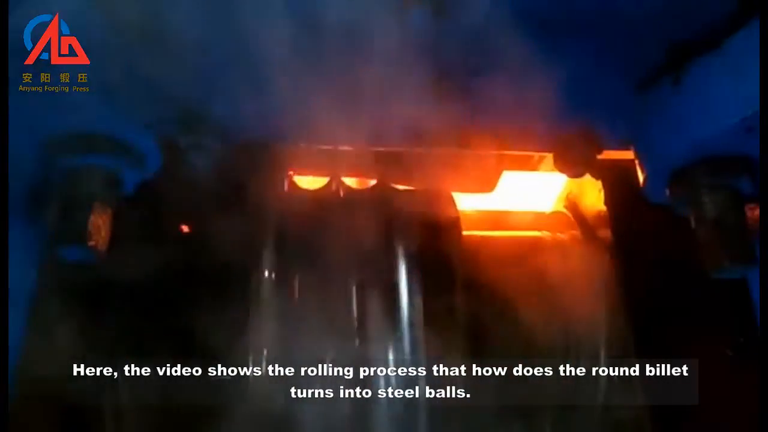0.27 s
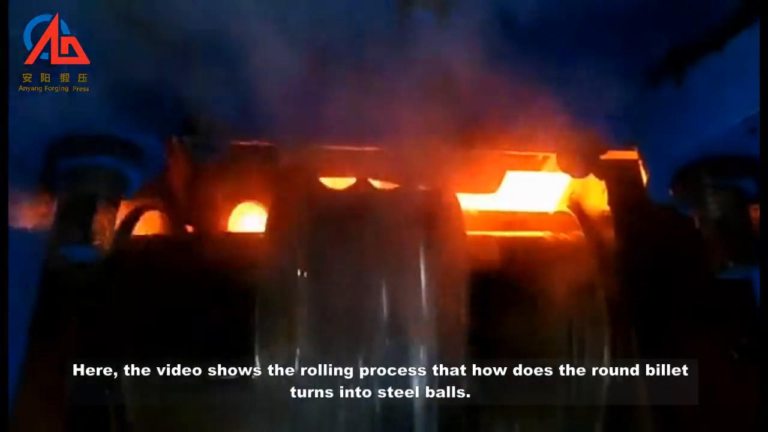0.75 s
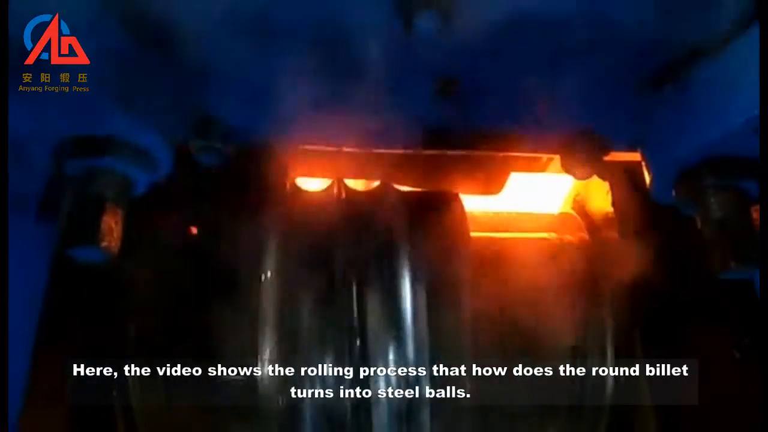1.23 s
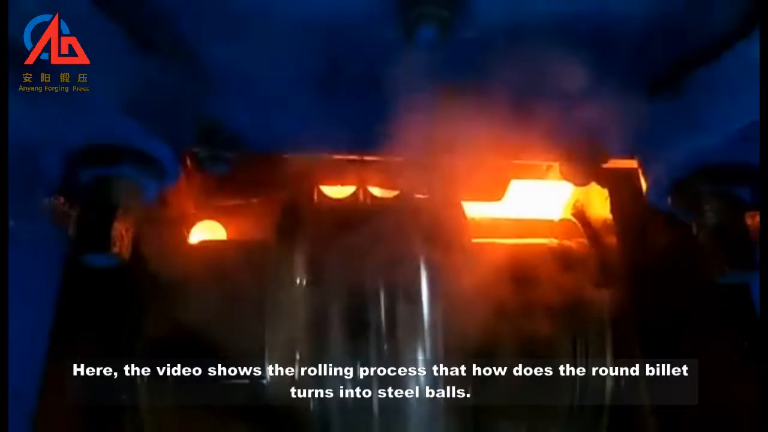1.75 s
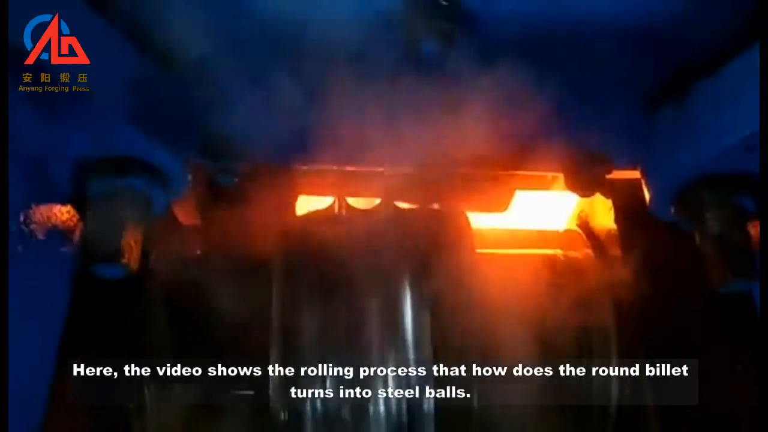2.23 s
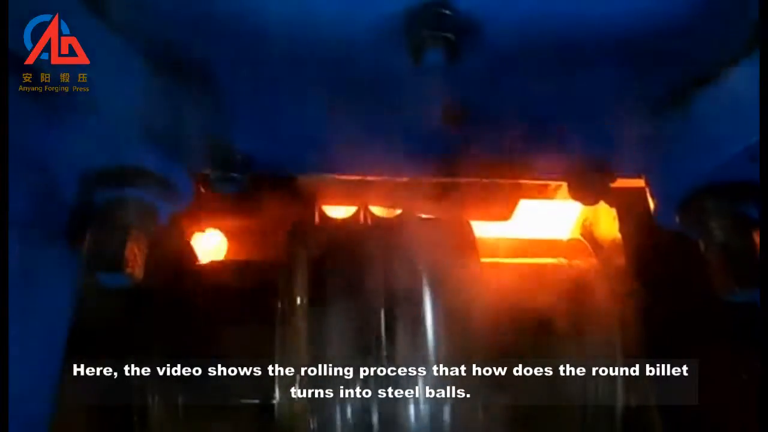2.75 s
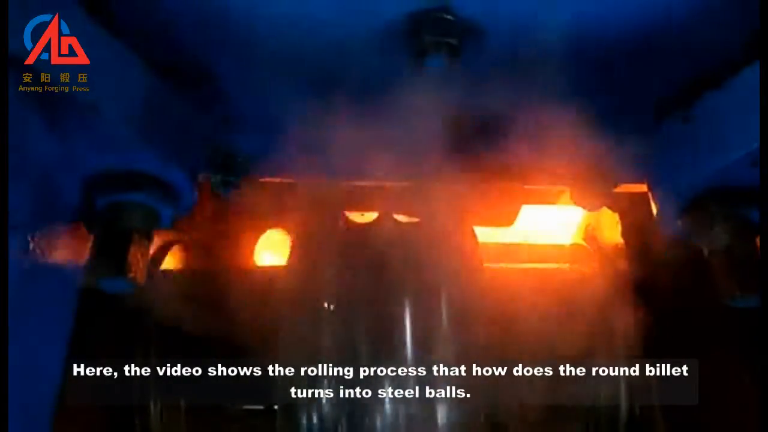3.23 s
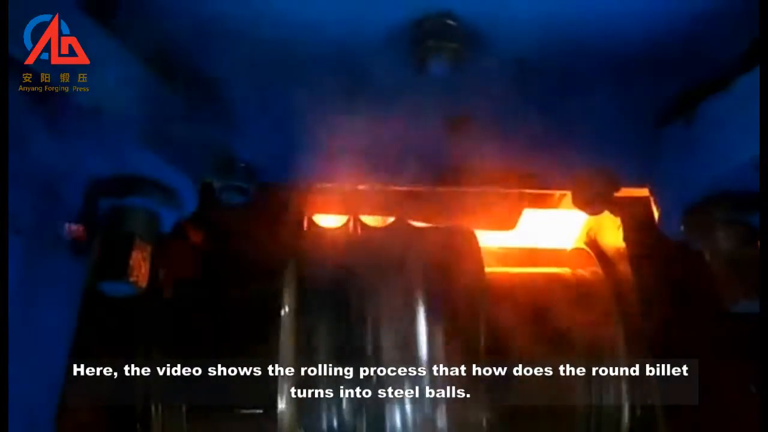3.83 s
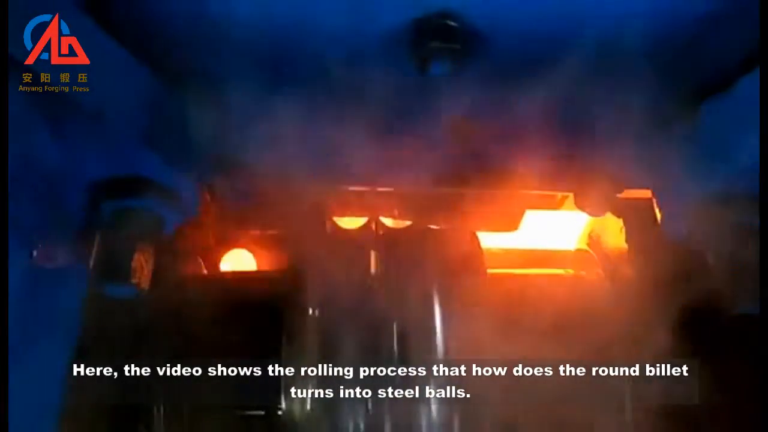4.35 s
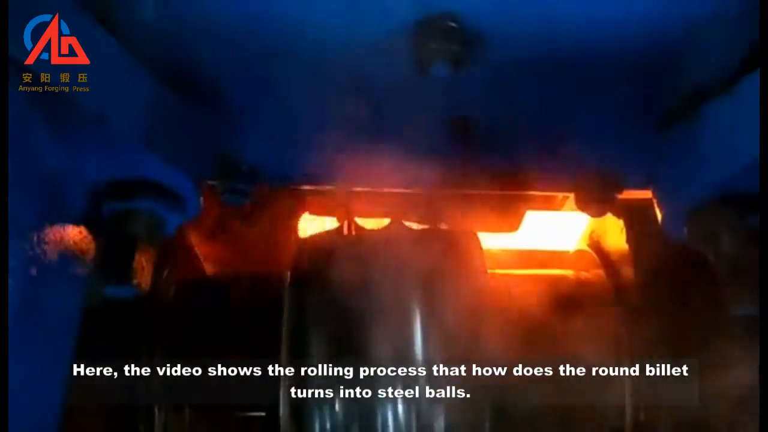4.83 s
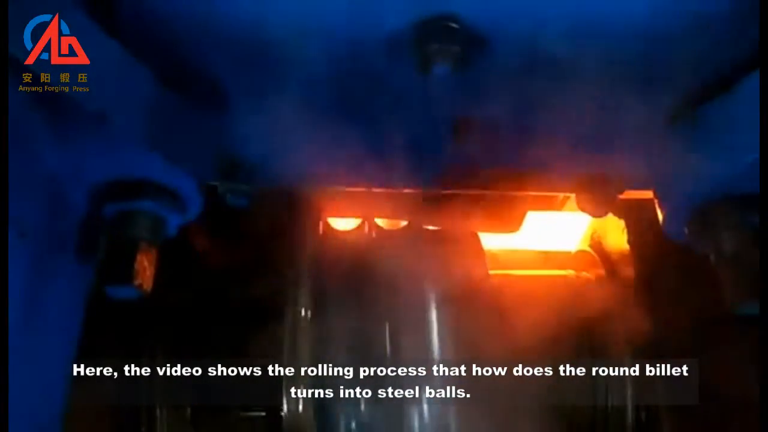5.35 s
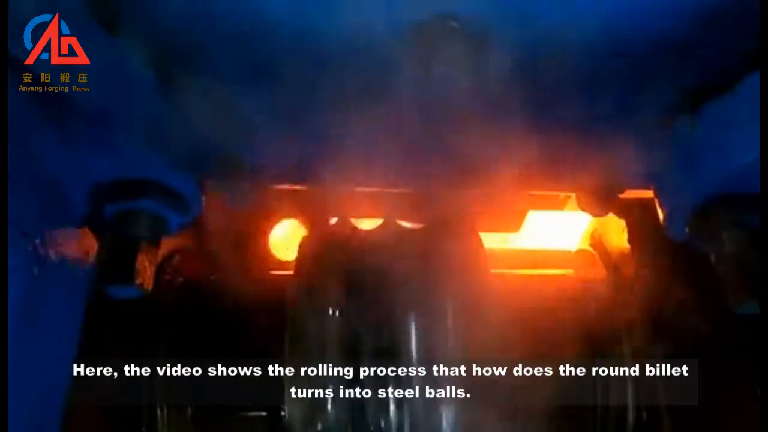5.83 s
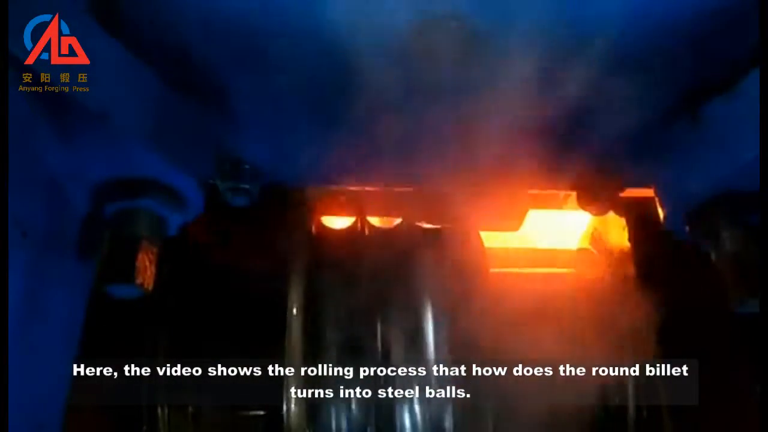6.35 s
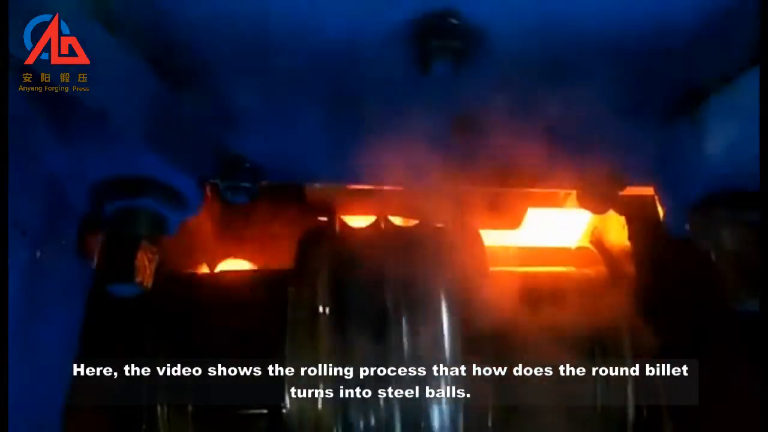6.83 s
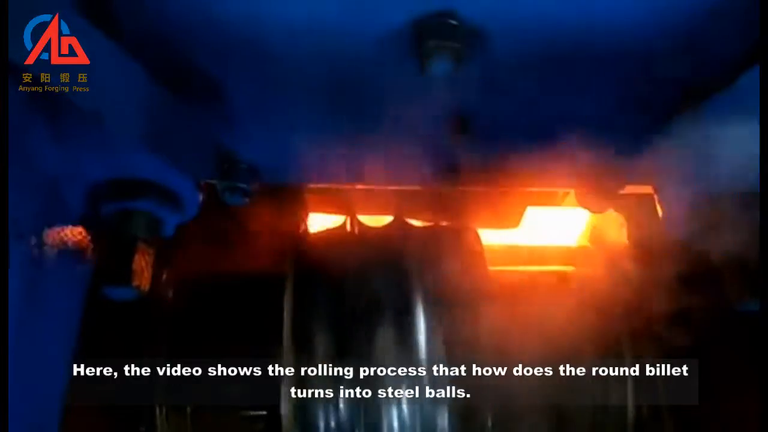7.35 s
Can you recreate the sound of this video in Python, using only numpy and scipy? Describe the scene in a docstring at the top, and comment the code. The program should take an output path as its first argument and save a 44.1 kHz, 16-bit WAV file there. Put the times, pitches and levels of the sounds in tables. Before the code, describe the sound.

Dense, uneven metallic banging and rattling of heavy balls on steel guides, with rough roller grinding, low rumble and short ringing hall echoes.

```python
"""Hot steel balls and billet knock and rattle on steel guides and chutes at a skew rolling mill, close by.
Each knock is a burst of noisy bounces and scraping, rung through the struck spot and the mill's modes.
A hall echo and chirps of small contacts trail the blows; clanks, groans, thuds and booms come and go.
Rolls grind, rumble and hum as their load changes, with a steady singing and a very faint water hiss.
The camera's gain control pushes the din down under loud knocks, and the loudest peaks clip."""
import sys
import numpy as np
from scipy import signal
from scipy.fft import rfft, irfft
from scipy.io import wavfile
from scipy.ndimage import uniform_filter1d

SR = 44100
rng = np.random.default_rng(int(sys.argv[2]) if len(sys.argv) > 2 else 0)


def store_wav(level_fs):
    """Save 16-bit WAV to argv[1]."""
    pcm = np.round(np.clip(np.atleast_2d(level_fs), -1, 1) * 32767)
    wavfile.write(sys.argv[1], SR, pcm.T.astype(np.int16))


N = 334278
TIME = np.arange(N) / SR
EDGE_HZ, SPIT_EDGE_HZ = 7560, 16000  # band limits: of the sound, and of the spit from clipped peaks

# balls and billet hitting the steel; the share not on the chute lands on the guides:
# start_s, force_db (relative), rise_s (before limits), extra_body_db, chute_share (0-1)
KNOCKS = [(0.0, 12.5, 0.0026, -5, 0.8), (.05, -1.5, 0.028, -5.5, 0.6), (0.094, 1.5, 0.02, -7, 0),
          (.165, -6, 0.011, 5.5, 0.3), (.268, -4, 0.042, 1, 0), (.34, -8, 0.038, -1, 0.5),
          (0.425, -3, 0.024, 4, 0.7), (0.499, -12, 0.013, 3, 0.6), (.588, -0.5, 0.0046, 4, 0),
          (.776, -2, 0.0052, 7, 1), (.848, 12, 0.0092, -3.5, 0.9), (0.906, 1.5, 0.028, -6, 0.4),
          (1.0, -5.5, 0.031, 3, 0.8), (1.08, -20.5, 0.065, 13.5, 0.1), (1.161, -24, 0.05, 3.5, 0.6),
          (1.254, -3.5, 0.005, 2.5, 0.2), (1.303, -7, 0.0021, 4.5, 0.15), (1.334, 3.5, 0.0056, -27, 0.4),
          (1.418, -8, 0.013, 3, .5), (1.459, 0.5, 0.041, 0.5, 0.3), (1.502, -5, 0.018, 0.5, 0),
          (1.535, -1.5, 0.009, -1, 0.04), (1.595, -4, 0.0078, 5, 0.9), (1.64, -6, 0.014, 0, 0.4),
          (1.685, -12.5, 0.017, 5, 0.4), (1.72, 4.5, 0.0089, -4.5, 0.94), (1.851, -1.5, 0.021, -1.5, 0.88),
          (1.957, -13.5, 0.0077, -2, 0), (2.149, 1, 0.019, -12.5, 0), (2.249, -7.5, 0.012, 2, 0.1),
          (2.298, -15, 0.0044, -3, 0.05), (2.565, 7, 0.0031, -5, 0.97), (2.699, 0.5, 0.0084, 0.5, 1),
          (2.755, 6.5, 0.024, 0, 0.15), (2.806, -2, 0.028, 3, 1), (2.871, -9, 0.025, 6.5, 1),
          (2.947, -10.5, 0.028, 1, 0.2), (3.003, -6, 0.008, 6.5, 0.2), (3.126, 1, 0.0097, 8.5, 0.4),
          (3.178, -31, 0.0054, 7, 0.6), (3.357, 8.5, 0.0075, -1.5, 0.8), (3.428, -1.5, 0.0019, 1.5, 0),
          (3.554, -9.5, 0.0046, 7.5, 0.5), (3.624, -8, 0.012, 4.5, 0.1), (3.739, 4, 0.011, -5, 0.2),
          (3.838, -4, 0.014, 4, 0.5), (3.88, -18.5, 0.0078, 15.5, 0.4), (4.227, -6, 0.041, 7, 0.4),
          (4.302, 2, 0.012, -8, 0.8), (4.395, -10, 0.0039, 1.5, 0.3), (4.447, 2.5, 0.013, -4.5, 1),
          (4.536, 3, 0.0058, -10, 0), (4.626, -8.5, 0.016, 1, 0), (4.685, -17, 0.027, 0, 0.1),
          (4.729, -8, 0.0053, 7, 0.2), (4.768, 4, 0.016, -12.5, 0), (4.897, -6, 0.0031, 7, 0.1),
          (5.087, -14.5, 0.012, 5, 0.6), (5.104, 6, 0.01, 2.5, 1), (5.213, -1.5, 0.013, 3, 0.1),
          (5.27, -16, 0.0069, 8.5, 1), (5.357, -14, 0.0021, 10, 0.95), (5.584, -8, 0.016, 8.5, 0.85),
          (5.754, -5.5, 0.006, 6, 0.7), (5.984, 4.5, 0.024, 1.5, 0.46), (6.042, -3, 0.01, -8, .4),
          (6.12, -13, .025, 9, 0.4), (6.19, -15.5, 0.007, 7, 0.3), (6.256, -16, 0.04, 8, 0.5),
          (6.298, 1.5, 0.013, -4.5, 0.4), (6.38, -4, 0.037, 4, 0.05), (6.461, -17, 0.0071, 16.5, 0.4),
          (6.539, -8.5, 0.028, 6.5, 0), (6.624, 3.5, 0.01, -2, 0.1), (6.797, 0, 0.041, 1, 0.77),
          (6.869, 4.5, 0.01, -1.5, 1), (6.915, -9, 0.012, 7.5, 0), (7.034, 6.5, 0.004, 0, 0.57),
          (7.354, 1.5, 0.012, -6.5, 0.24), (7.438, -6, 0.0066, 2, 0), (7.524, -4.5, 0.027, 2, 0)]
# a harder blow has more edge, a heavier one less: dB at force 0, dB per dB of force, dB per dB of body
EDGE_DB, EDGE_PER_FORCE, EDGE_PER_BODY = -4, 0.67, -0.066
# chance differences between blows (rms dB): left-right, edge, height of each struck mode
PAN_SCATTER_DB, EDGE_SCATTER_DB, MODE_SCATTER_DB = 3, 3.5, 3.5
MODE_DETUNE = 0.003  # rms share of a struck mode's pitch
# a hard blow throws the ball clear, a soft one rattles on: decay in s at force 0, dB of it per dB of force
RATTLE_S, RATTLE_PER_FORCE = 0.039, -0.14
# resonances of the struck chute: pitch_hz, width_hz, left_height_db, right_height_db
CHUTE_MODES = [(1324, 70, 6.5, 3.5), (3142, 34, 14, 7), (3865, 70, 5, 11)]
# resonances of the struck guides: pitch_hz, width_hz, left_height_db, right_height_db
GUIDE_MODES = [(1981, 30, 8, 8), (2595, 150, 6, 5.5), (3922, 60, 3, 4), (4585, 55, 3.2, 7.3)]
# resonances of the whole mill, before each use scales them: pitch_hz, width_hz, left_height_db, right_height_db
MILL_MODES = [(765, 40, 3, 6.5), (976, 60, 10, 10.5), (1100, 80, 2, 6), (1324, 30, 4, 5),
              (1419, 70, 0.5, 3), (1560, 50, 1.5, 4), (2165, 35, 3, 3), (2440, 40, 1, 3), (3292, 50, 3, 4),
              (3648, 45, 3, 6), (3922, 30, 2, 6), (4077, 35, 2, 6), (4340, 40, 1, 4), (4575, 80, -1, 2),
              (4750, 40, 0, 3)]
# smooth colour of a knock: frequency_hz, relative_level_db
STEEL_COLOUR = [(40, -35), (200, -16), (500, -16), (900, -9), (1500, -6.5), (1690, -15.5), (1870, -12),
                (2050, -2.5), (2900, -5.5), (4000, -2), (4750, -1.5), (5350, 0), (6200, -3.5),
                (7400, -16.5)]
# stereo tilt of the steelwork: frequency_hz, left_minus_right_db
BALANCE = [(100, 10), (500, 0), (1500, 3), (1750, 3), (2300, 0), (3200, -0.5), (3700, -5), (4700, -5),
           (5500, -2.5), (6200, 0.5), (7400, 4.5)]
# likeness of the two sides: frequency_hz, correlation (-1 to 1)
LIKENESS = [(25, 0.94), (60, .96), (130, .98), (260, .95), (480, 0.72), (800, 0.2), (1200, -.5),
            (2000, -0.1), (7500, -0.05)]
# echo decay of the hall: frequency_hz, t60_s
HALL_DECAY = [(100, 0.17), (1000, 0.66), (4000, 0.38), (7500, 0.8)]
# chirps of scale and small contacts: dB against the echo, rms rate per second, rms scatter in dB
CHIRP_DB, CHIRPS_PER_S, CHIRP_SCATTER_DB = -2.5, 330, 4.5
CHIRP_LOW_HZ, CHIRP_HIGH_HZ, CHIRP_T60_S = 2000, 5800, .05

# load on the rolls, rising as they bite the billet: time_s, load_db (over the usual load)
LOAD = [(0.0, 9.5), (.15, -3.5), (.3, 1.5), (.58, 8.5), (.95, -1.5), (1.15, 4.5), (1.3, 6.5), (1.41, -9),
        (1.5, -8.5), (1.7, 7), (1.82, 0), (1.97, 7), (2.14, -4), (2.33, 1.5), (2.52, -10.5), (2.66, -3),
        (2.8, 9), (3.17, 9.5), (3.42, 0), (3.69, 9), (3.92, 0.5), (4.16, -12.5), (4.27, -3.5), (4.4, -3.5),
        (4.6, -2), (4.95, 3), (5.16, -11), (5.34, 8.5), (5.6, -7), (5.77, 2), (5.96, -6.5), (6.25, 6.5),
        (6.42, 1), (6.58, 7), (6.74, 2), (7.17, 7), (7.43, -6), (7.58, 2)]
# what the load drives, before the gain control: dB at the usual load, dB per dB of load
GRIND_DB, GRIND_PER_LOAD = -23, 1.05
RUMBLE_DB, RUMBLE_PER_LOAD = -23.5, 0.77
HUM_DB, HUM_PER_LOAD = -1.5, 0.82  # on top of the hum table's levels
# smooth colour of the grinding: frequency_hz, relative_level_db
GRIND_COLOUR = [(40, -35.5), (200, -20.5), (500, -14.5), (680, 2.5), (830, 1), (1000, -7), (1200, -8),
                (1600, -8.5), (1720, -9), (1860, -26), (2020, -4.5), (3000, -8), (5200, -7.5),
                (7400, -39.5)]
# smooth colour of the cooling water: frequency_hz, relative_level_db
SPRAY_COLOUR = [(300, -14), (900, -2), (1550, -15.5), (1690, -25), (1870, -21), (2050, -2), (2600, 4),
                (2950, -14), (3400, -9), (5200, 0), (6200, 13), (7400, -13)]
# smooth colour of the rumble: frequency_hz, relative_level_db
RUMBLE_COLOUR = [(15, -1.5), (30, -12), (50, 2), (70, -3.5), (120, -4), (165, 0.5), (250, -3.5), (330, 4.5),
                 (400, 0), (470, -6.5), (650, -8), (1200, -44), (4000, -60)]
# hum of the drive: pitch_hz, relative_level_db
HUM_TONES = [(145.3, -32.5), (226, -35), (249, -41.5), (291, -36.5), (759, -41)]
# steady singing of the turning billet: pitch_hz, level_db
SINGING_TONES = [(1777, -48), (1980, -52), (2669, -52), (2974, -44.5)]

# the rolls lurch and the housing thuds: start_s, length_s, level_db, centre_hz
THUDS = [(.26, 0.049, -26, 170), (1.68, .07, -36, 250), (2.82, .2, -25.5, 220), (3.007, 0.1, -16, 220),
         (3.178, 0.067, -10.5, 200), (3.684, .06, -33, 330), (4.248, .07, -21.5, 290),
         (4.92, .09, -23, 150), (5.309, 0.15, -23.5, 340), (5.592, 0.094, -21.5, 260),
         (5.74, 0.041, -15, 210), (6.211, 0.14, -28, 330)]
THUD_WIDTH_HZ, THUD_RISE_S = 100, 0.017  # distance from centre to half amplitude; rise
# the billet binds in the rolls and groans: start_s, end_s, strength_db (relative), pitch_hz
GROANS = [(.33, .83, -3, 810), (1.44, 1.68, -2, 780), (2.76, 3.32, 0, 820)]
GROAN_DB = -17  # added to every groan's strength
# clanks: dull narrow ones of rolls and bearings, crisp wide ones as the crack of hard ball strikes: # start_s,
# level_db (relative), centre_hz, width_hz (about from centre to half amplitude)
CLANKS = [(.45, -5, 2190, 200), (.588, -4, 2300, 2500), (.777, -9.5, 2000, 3000), (1.057, -12, 2200, 353),
          (1.255, -9, 2400, 3000), (1.311, -2, 2100, 2200), (2.063, -17, 2300, 2020),
          (2.568, -3, 3000, 4000), (3.043, -11, 1670, 1780), (3.635, -14, 1300, 1000),
          (3.714, -10.5, 1020, 694), (4.451, -6.5, 1250, 450), (4.757, -9.5, 1980, 820),
          (4.9, -13.5, 2300, 3000), (5.107, -4.5, 3600, 4500), (5.357, -5, 1760, 2800),
          (5.756, -11, 2400, 3500), (5.897, -21.5, 1100, 700), (6.046, -12, 1040, 504),
          (7.033, -2, 3000, 4000), (7.536, -18, 975, 100)]
CLANK_RISE_S, CLANK_DECAY_S = 0.0036, 0.0092
# deep booms of the frame: start_s, end_s, level_db
BOOMS = [(2.236, 2.547, -30.5), (3.1, 3.29, -26), (3.597, 3.737, -29), (5.3, 5.846, -32),
         (6.453, 6.66, -27), (7.43, 7.62, -31)]
# smooth colour of the booms: frequency_hz, relative_level_db
BOOM_COLOUR = [(20, -18), (52, 0), (95, 1.5), (160, -13), (330, -21), (700, -41.5), (3000, -99)]


def amp(db):
    """Turns decibels into a gain."""
    return 10 ** (np.asarray(db) / 20)


def unit(x):
    """Scales to rms 1."""
    return x / np.sqrt(np.mean(x ** 2) + 1e-20)


def read(points, hz):
    """Reads a table on a log-frequency axis."""
    f, value = np.transpose(points)
    return np.interp(np.log(hz + 1), np.log(f + 1), value)


def add(mix, s, sound):
    """Mixes a sound in at time s."""
    part = mix[..., max(round(s * SR), 0):][..., :sound.shape[-1]]
    part += sound[..., :part.shape[-1]]


def sides(db):
    """Left and right gains for a level difference."""
    gains = amp(np.array([[1], [-1]]) * db / 2)
    return gains / np.sqrt(np.mean(gains ** 2, 0))


def drift(rate, size=16384):
    """Slow chance of about rms 1, up to about rate changes a second."""
    hz = np.fft.rfftfreq(size, TIME[-1] / size)
    slow = irfft(rfft(rng.standard_normal(size)) * np.exp(-(hz / rate) ** 2))
    return np.interp(TIME, np.linspace(0, TIME[-1], size), unit(slow))


def swell_between(start, end, fade_s):
    """A level that fades in from start and out towards end in straight lines."""
    return np.clip(np.minimum(TIME - start, end - TIME) / fade_s, 0, 1)


def pair(x):
    """The two microphone ports hear the bass alike and the treble apart."""
    a, b = rfft(x)
    angle = np.arcsin(np.clip(read(LIKENESS, np.fft.rfftfreq(N, 1 / SR)), -1, 1)) / 2
    left = np.cos(angle) * a + np.sin(angle) * b
    right = np.sin(angle) * a + np.cos(angle) * b
    return irfft([left, right], N)


def coloured_shake(colour):
    """Steady stereo noise with a smooth colour."""
    gain = amp(read(colour, np.fft.rfftfreq(N, 1 / SR)))
    return irfft(rfft(pair(rng.standard_normal((2, N)))) * gain, N)


def causal(db):
    """Minimum-phase impulse response for gains over the full circle: it rings only after the blow."""
    return np.fft.ifft(np.exp(signal.hilbert(np.log(amp(db))).conj())).real


def peaks(modes, hz):
    """Left and right heights in dB of a table of resonances."""
    return sum(np.array([[left], [right]]) / (1 + (2 * (hz - centre) / width) ** 2)
               for centre, width, left, right in modes)


def struck(modes):
    """Gives the modes the chance heights and slight detuning of one blow."""
    height, detune = rng.standard_normal((2, len(modes), 1))
    detuned = np.array(modes) * (1 + MODE_DETUNE * detune * np.array([1, 0, 0, 0]))
    return detuned + MODE_SCATTER_DB * height * np.array([0, 0, 1, 1])


def steelwork(x, colour, ring, size=8192):
    """Passes contact forces through the mill's modes: a filter of mean energy 1 over both sides."""
    hz = abs(np.fft.fftfreq(size, 1 / SR))
    db = read(colour, hz) + np.array([[1], [-1]]) * read(BALANCE, hz) / 2
    db = db + ring * peaks(MILL_MODES, hz)
    db = db - 40 * np.clip(hz / EDGE_HZ - 1, 0, 1) ** .5
    response = causal(db)[:, :size // 2]
    response = response / np.sqrt(np.sum(response ** 2) / 2)
    return signal.oaconvolve(pair(x), response, axes=1)[:, :N]


def shifting(x, patch_db):
    """As the steel turns and slides, its partials come and go in short narrow patches."""
    hz, _, z = signal.stft(x, SR, nperseg=1024, noverlap=768)
    field = rng.standard_normal(z.shape[::-1]).T
    field = field + field.mean(0)  # partly shared by both sides
    for axis, count in [(1, 4), (1, 3), (2, 7), (2, 4)]:  # smooth over frequency, then time
        field = uniform_filter1d(field, size=count, axis=axis)
    gain = amp(patch_db * np.minimum(unit(field), 1.6))
    return signal.istft(z * unit(gain), SR, nperseg=1024, noverlap=768)[1][:, :N]


def knock(s, db, rise, body_db, on_chute, bounces_per_s=330, bounce_s=0.00022, scrape=1.0,
          ripple_db=4.0, ragged_db=1.44, rise_power=1.17, size=8192):
    """Contact builds, then bounces and scraping die away: force at the struck spot and in the frame."""
    rattle_s = RATTLE_S * amp(RATTLE_PER_FORCE * db)
    rise = np.clip(rise, .003, .1)
    t = np.arange(SR // 2) / SR
    hz = np.fft.rfftfreq(size, 1 / SR)
    bounces = (rng.random(len(t)) < bounces_per_s / SR) * rng.uniform(0.29, 2.66, len(t))
    chatter = scrape + signal.lfilter([1], [1, -np.exp(-1 / (bounce_s * SR))], bounces)
    ragged = amp(ragged_db * np.tanh(drift(53)[:len(t)]))  # the ball strikes, lifts and strikes again
    swell = ragged * np.minimum(t / rise, 1) ** rise_power
    swell = swell * np.exp(-np.maximum(t - rise, 0) / rattle_s)
    # bounces change the texture of a blow but not its energy
    contact = swell * chatter * np.sqrt(np.sum(swell ** 2) / np.sum((swell * chatter) ** 2))
    # chute or guides ring out, and each struck spot has many weak partials of its own
    ring_db = on_chute * peaks(struck(CHUTE_MODES), hz) + (1 - on_chute) * peaks(struck(GUIDE_MODES), hz)
    ripple = uniform_filter1d(rng.standard_normal(len(hz)), size=18)
    partials_db = ripple_db * unit(uniform_filter1d(ripple, size=10))
    # a heavy blow has more body, a hard one more edge
    edge_db = EDGE_DB + EDGE_PER_FORCE * db + EDGE_PER_BODY * body_db
    edge_db += EDGE_SCATTER_DB * rng.standard_normal()
    weight_db = body_db * read([(1900, 0.98), (2800, 0.024)], hz)
    weight_db = weight_db + edge_db * read([(5200, 0.098), (6600, 1.0)], hz)
    colour_db = np.array([weight_db + ring_db + partials_db, weight_db + ring_db])  # spot, frame
    full_circle_db = np.concatenate([colour_db, colour_db[..., -2:0:-1]], axis=-1)
    rings = causal(full_circle_db)[..., :size // 2]
    force = signal.fftconvolve(contact * rng.standard_normal((1, 2, len(t))), rings, axes=-1)
    return s, amp(db) * sides(PAN_SCATTER_DB * rng.standard_normal()) * force


def knocks():
    """All blows ring the same steelwork: struck spots are heard close by, the frame feeds the hall."""
    force = np.zeros((2, 2, N))
    for row in KNOCKS:
        add(force, *knock(*row))
    spots = steelwork(force[0], STEEL_COLOUR, ring=0.98)
    frame = steelwork(force[1], STEEL_COLOUR, ring=0.77)
    return spots, frame


def hall(x, gap_s=0.0049, count=3, turns_per_s=2.3):
    """Dense tails whose bands die at their own speeds; a turning mix varies the paths of the blows."""
    out = np.zeros((2, N))
    for k in range(count):
        hz, t, z = signal.stft(rng.standard_normal((2, SR)), SR, nperseg=256)
        z = z * amp(-60 * t / read(HALL_DECAY, hz)[:, None]) * (1 - np.exp(-t / gap_s))
        tail = signal.istft(z * (hz < EDGE_HZ)[:, None], SR, nperseg=256)[1]
        tail *= np.sqrt(2 * EDGE_HZ / SR) / np.linalg.norm(tail[0])
        share = np.sqrt(2 / count) * np.cos(np.pi * (turns_per_s * TIME + k / count))
        out += signal.fftconvolve(x * share, tail, axes=1)[:, :N]
    return out


def chirps(echo, cluster_db=6, follow_s=0.06):
    """Scale and small contacts chirp in clusters of short partials that follow the echo's level."""
    out = np.zeros((2, N))
    t = np.arange(SR // 16) / SR
    crowding = unit(amp(cluster_db * np.tanh(drift(22)) * 2))
    times = TIME[rng.random(N) < crowding * CHIRPS_PER_S / SR]
    for s in times:
        pitch, left, right = rng.random(3)
        strength, place = rng.standard_normal(2)
        hz = CHIRP_LOW_HZ + pitch * (CHIRP_HIGH_HZ - CHIRP_LOW_HZ)
        ring = np.sin(2 * np.pi * (hz * t + np.array([[left], [right]]))) * 1000 ** (-t / CHIRP_T60_S)
        level = amp(CHIRP_SCATTER_DB * min(strength, 1.5))
        add(out, s, level * sides(read(BALANCE, hz) + PAN_SCATTER_DB * place) * ring)
    power = uniform_filter1d((echo ** 2).mean(0), size=round(follow_s * SR))
    return amp(CHIRP_DB) * unit(out) * np.sqrt(abs(power))


def load():
    """The load on the rolls in dB, in straight lines between the table's points."""
    return np.interp(TIME, *np.transpose(LOAD))


def grinding(grain_db=3, lurch_db=2):
    """The rolls bite the billet in uneven small slips that drive the steelwork."""
    unevenness = amp(grain_db * drift(180) + lurch_db * drift(27))
    slips = unit(unevenness * rng.standard_normal((2, N)))
    return steelwork(slips * amp(GRIND_DB + GRIND_PER_LOAD * load()), GRIND_COLOUR, ring=0.11)


def spray():
    """Cooling water hisses on the rolls and hot steel: noise with a slight flicker in level."""
    return steelwork(rng.standard_normal((2, N)) * amp(1.0 * drift(12)), SPRAY_COLOUR, ring=.7)


def rumble(shudder_db=3.5):
    """The heavy frame and gears shudder with the load: low noise of uneven strength."""
    shudder = amp(shudder_db * np.tanh(drift(26)))
    return unit(coloured_shake(RUMBLE_COLOUR) * shudder) * amp(RUMBLE_DB + RUMBLE_PER_LOAD * load())


def tones(lines, waver, flutter):
    """Narrow lines that waver in pitch and strength."""
    out = np.zeros((2, N))
    for hz, db in lines:
        turns = np.cumsum(hz * (1 + waver * drift(7.2))) / SR
        strength = 1 + flutter * drift(6.2)
        apart = np.arccos(np.clip(read(LIKENESS, hz), -1, 1))  # phase between the sides
        out += amp(db) * unit(strength * np.sin(2 * np.pi * turns + np.array([[0], [apart]])))
    return out


def hum():
    """The drive hums on a few low lines, stronger under load."""
    return amp(HUM_DB + HUM_PER_LOAD * load()) * tones(HUM_TONES, waver=0.00816, flutter=1.0)


def singing():
    """The turning billet sings on high lines with a slight waver in pitch."""
    return tones(SINGING_TONES, waver=.001, flutter=0.64)


def thuds():
    """Each lurch shakes one broad, low resonance of the housing."""
    out = np.zeros((2, N))
    t = np.arange(SR // 2) / SR
    hz = np.fft.rfftfreq(len(t), 1 / SR)
    for s, length, db, centre in THUDS:
        swell = np.minimum(t / THUD_RISE_S, 1) * np.exp(-(t / length) ** 4)
        resonance = 1 / (1 + ((hz - centre) / THUD_WIDTH_HZ) ** 4)
        shake = irfft(rfft(rng.standard_normal((2, len(t)))) * resonance, len(t))
        add(out, s, amp(db) * unit(swell * shake) * np.sqrt(np.mean(swell ** 2)))
    return pair(out)


def groans(width_hz=85, wander=0.025, fade_s=0.04):
    """Uneven slips drive one wandering resonance of the billet."""
    out = np.zeros((2, N))
    for start, end, db, hz in GROANS:
        slips = np.array([drift(width_hz) + 1j * drift(width_hz) for _ in range(2)])
        turns = np.cumsum(hz * (1 + wander * drift(6.02))) / SR
        groan = (slips * np.exp(2j * np.pi * turns)).real
        out += amp(GROAN_DB + db) * swell_between(start, end, fade_s) * groan
    return pair(out)


def clanks():
    """Each is a brief jolt of one broad, heavily damped resonance: of rolls and bearings, or the crack of a
    hard ball strike."""
    out = np.zeros((2, N))
    t = np.arange(SR // 5) / SR
    hz = np.fft.rfftfreq(len(t), 1 / SR)
    jolt = np.minimum(t / CLANK_RISE_S, 1) * np.exp(-np.maximum(t - CLANK_RISE_S, 0) / CLANK_DECAY_S)
    for s, db, centre, width in CLANKS:
        resonance = 1 / (1 + ((hz ** 2 - centre ** 2) / (2 * width * hz + 1)) ** 2)
        ring = jolt * irfft(rfft(rng.standard_normal((2, len(t)))) * resonance, len(t))
        add(out, s, amp(db) * unit(ring) * np.sqrt(np.mean(jolt ** 2)))
    return pair(out)


def booms(fade_s=0.046):
    """Deep vibration of the frame swells and fades."""
    swells = sum(amp(db) * swell_between(start, end, fade_s) for start, end, db in BOOMS)
    return unit(coloured_shake(BOOM_COLOUR)) * swells


def scene():
    """Knocks, clanks and their echo over the running mill."""
    spots, frame = knocks()
    jolts = amp(3.5) * clanks()
    blows = amp(0.5) * shifting(spots, patch_db=2.0) + jolts
    echo = amp(-8.0) * shifting(hall(frame + jolts), patch_db=7.0)
    wash = shifting(grinding() + amp(-42.0) * spray(), patch_db=6.5)
    running = wash + rumble() + hum() + singing()
    return blows + echo + chirps(echo) + running + thuds() + groans() + booms()


def lowpass(x, hz):
    """A steep band limit."""
    taps = signal.firwin(401, hz, window=("kaiser", 8), fs=SR)
    return signal.oaconvolve(x, taps[None], "same", axes=1)


def record(dry, threshold_db=-20, squeeze=0.55, level_fall_db_per_s=70, ceiling=0.89):
    """Fast gain control, soft overload and a band limit; peaks over the ceiling clip and spit above it."""
    power_db = 10 * np.log10(abs(uniform_filter1d((dry ** 2).mean(0), size=440)) + 1e-12)
    # the sensed level jumps up at once and falls at a steady rate
    fall = TIME * level_fall_db_per_s
    sensed_db = np.maximum.accumulate(power_db + fall) - fall
    over_db = np.maximum(sensed_db - threshold_db, 0)
    held = dry * amp(-squeeze * uniform_filter1d(over_db, size=260))
    bent = held / (1 + (held / .85) ** 6) ** (1 / 6)
    clipped = np.clip(lowpass(bent, EDGE_HZ), -ceiling, ceiling)
    return lowpass(clipped, SPIT_EDGE_HZ)


dry = scene()
out = record(dry)
store_wav(out)
```